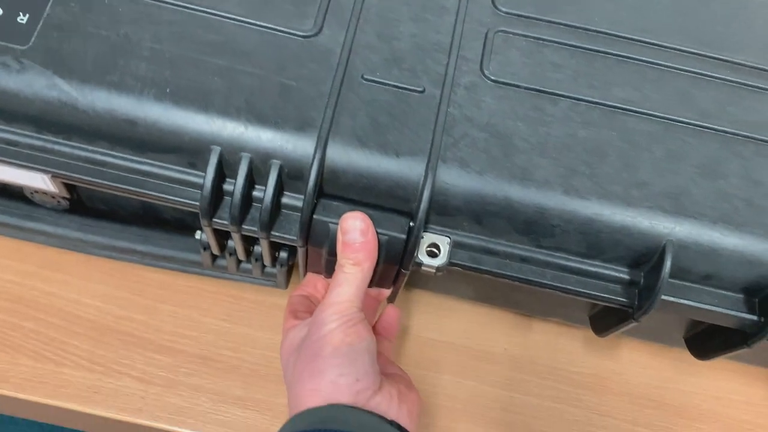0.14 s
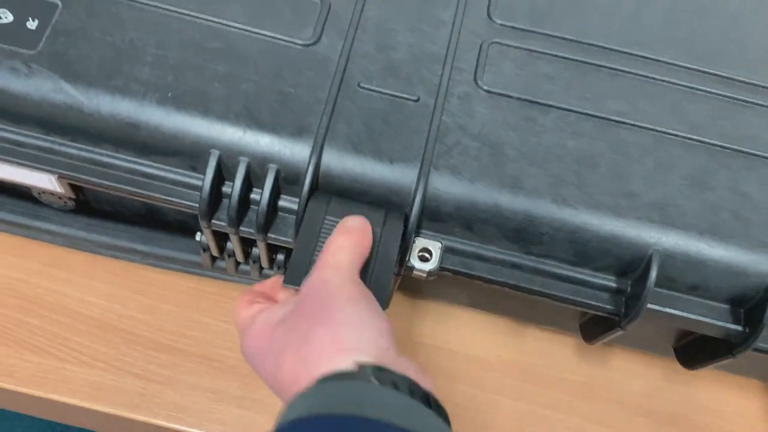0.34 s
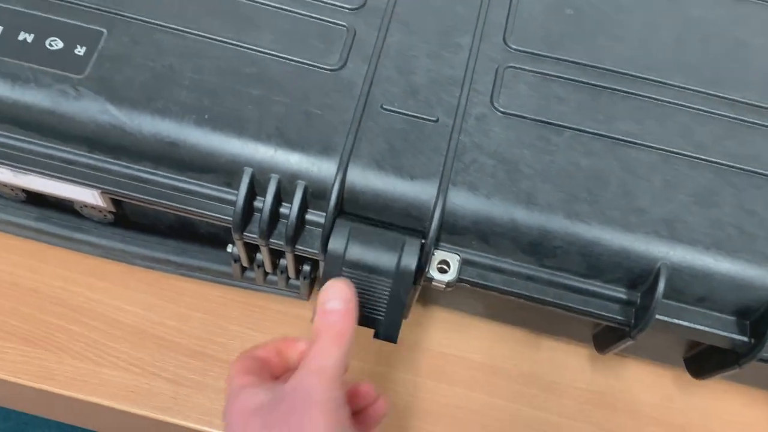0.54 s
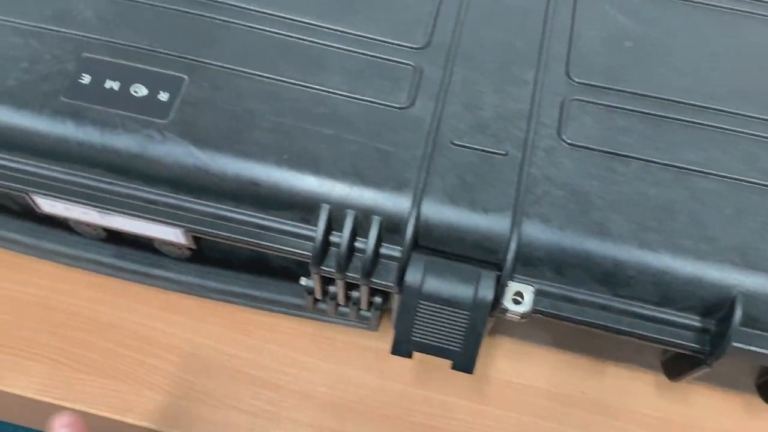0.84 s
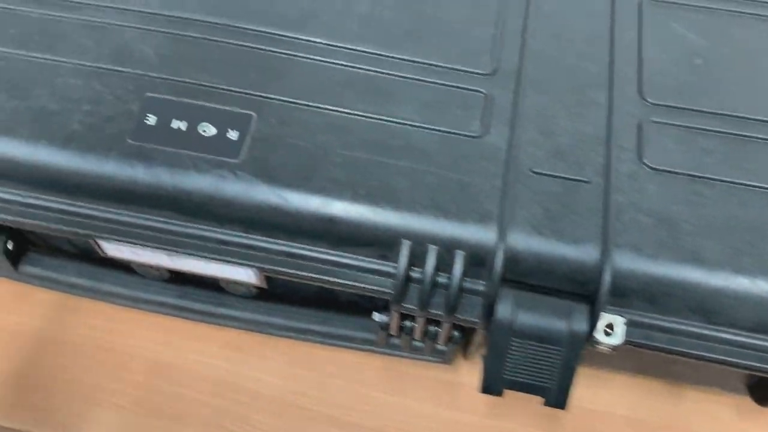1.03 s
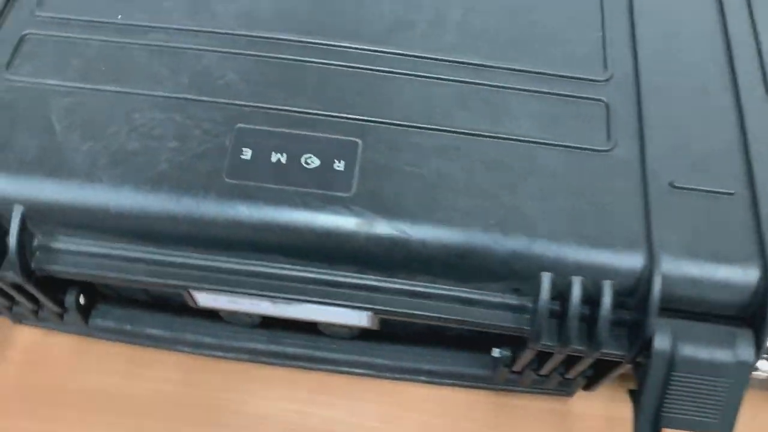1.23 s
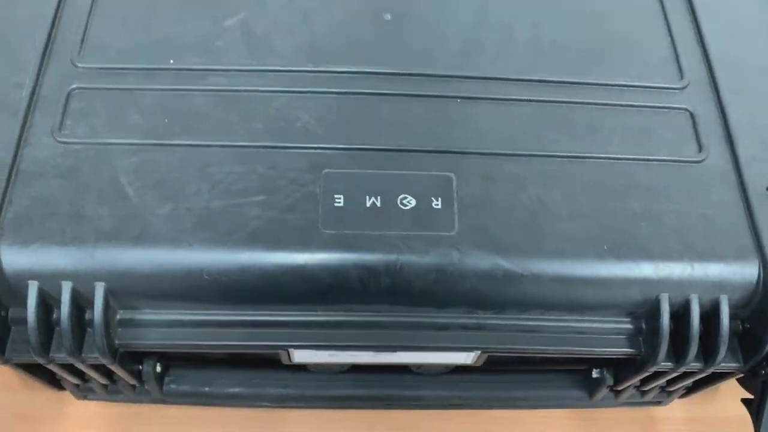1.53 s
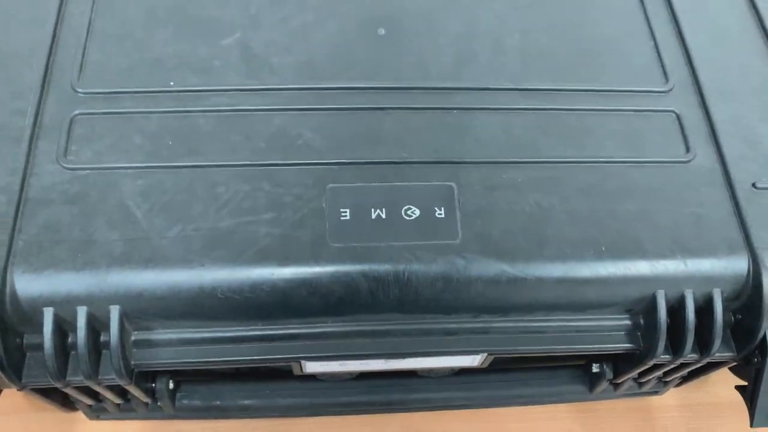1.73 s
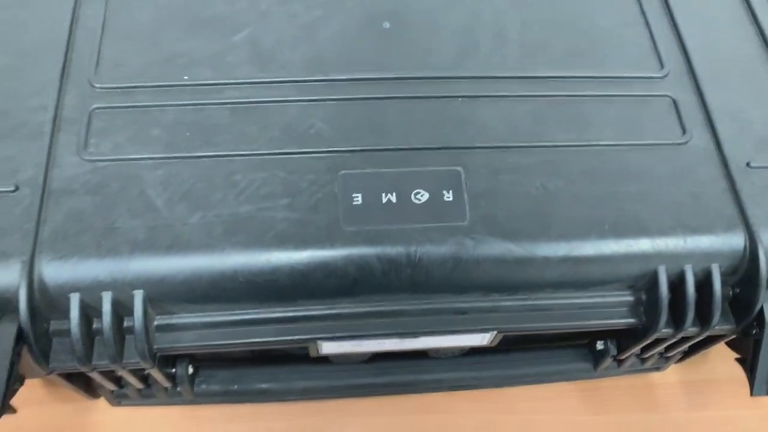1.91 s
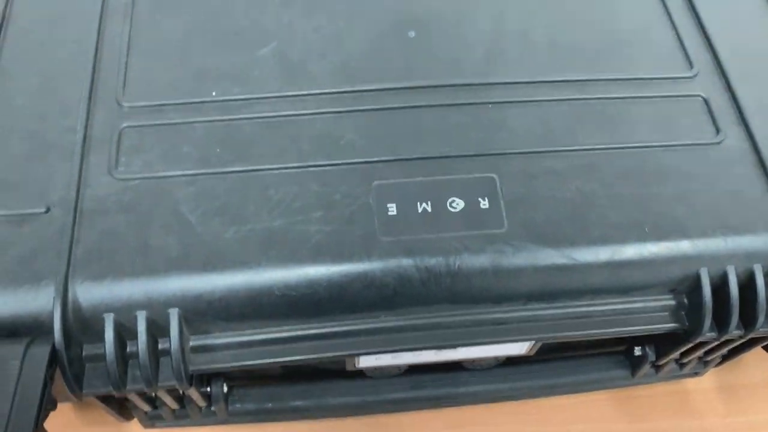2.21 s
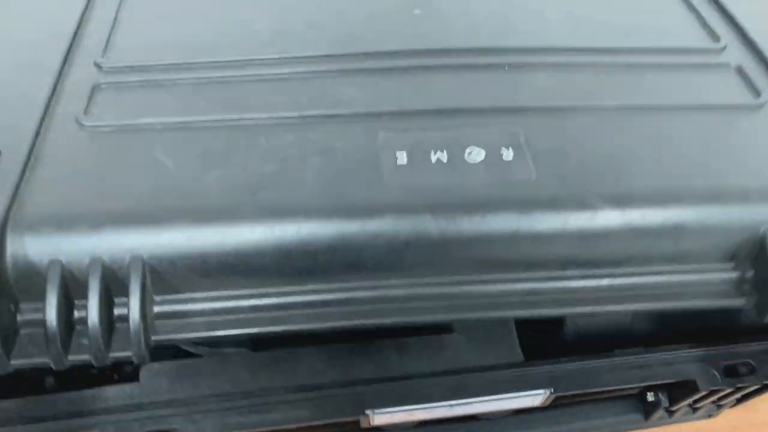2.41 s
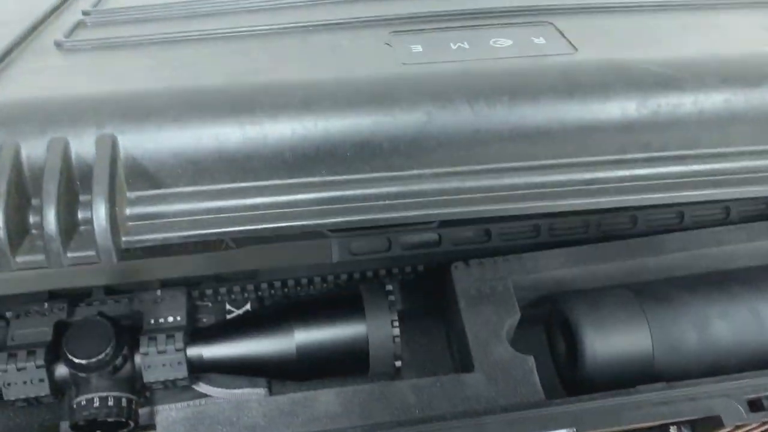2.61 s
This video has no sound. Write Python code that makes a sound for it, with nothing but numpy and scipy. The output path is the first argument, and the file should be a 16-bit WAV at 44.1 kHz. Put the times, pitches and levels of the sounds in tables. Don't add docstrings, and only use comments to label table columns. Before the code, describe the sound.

Close stereo phone pickup in a quiet, slightly echoing room: a case latch cracks open and drops back, fingers brush and tick a loose handle, then a sticky seal tears and the hollow lid thumps upward.

```python
import sys
import numpy as np
from scipy import signal
from scipy.fft import rfft, irfft
from scipy.io import wavfile
from scipy.ndimage import uniform_filter1d

SR = 44100
rng = np.random.default_rng(int(sys.argv[2]) if len(sys.argv) > 2 else 0)


def store_pcm(level_fs):
    pcm = np.round(np.clip(level_fs, -1, 1) * 32767).astype(np.int16)
    wavfile.write(sys.argv[1], SR, np.atleast_2d(pcm).T)


def voltage_ratio(decibels):
    exponent = np.asarray(decibels, float) / 20
    return 10 ** exponent


N = 121275
SIDES = np.array([[1], [-1]])


def colour(x, points):
    p, n = np.array(points), x.shape[-1]
    hz = np.maximum(np.fft.rfftfreq(n, 1 / SR), 1)
    gain_db = np.interp(np.log(hz), np.log(p[:, 0]), p[:, 1])
    return irfft(rfft(x) * voltage_ratio(gain_db), n)


def unit(x):
    return x / np.sqrt(np.mean(x ** 2))


def peak(x):
    return x / np.abs(x).max()


def fade(t, t60):
    return np.exp(-np.log(1000) * t / t60)


def add(out, start_s, x):
    i = int(start_s * SR)
    out[i:i + len(x)] += x[:len(out) - i]


# pitch_hz, level_db (per Hz)
AIR_COLOUR = [(20, -27.5), (40, -8), (75, -9), (170, -32), (500, -47), (3000, -51.5), (14500, -53),
              (16000, -79.5)]


def air():
    sway = unit(uniform_filter1d(rng.standard_normal(N), 3000))
    mid, side = colour(rng.standard_normal((2, N)), AIR_COLOUR)
    return voltage_ratio(-65 + 2 * sway) * unit(mid + 0.18 * side * SIDES)


# pitch_hz, t60_s, level_db
ROOM_DECAY = [(69.4, 0.32, -24), (148, 0.67, -6), (400, 0.81, -9.5), (930, 0.51, -7), (2310, 0.59, -10),
              (4600, 0.3, -12), (10400, 0.35, -16)]


def room(x):
    t, tail = np.arange(SR) / SR, 0
    for hz, t60, db in ROOM_DECAY:
        band = signal.butter(2, [hz / 2.034, hz * 1.405], "band", fs=SR, output="sos")
        mid, side = signal.sosfilt(band, rng.standard_normal((2, SR)))
        width = min(hz / 500, 1)
        strength = voltage_ratio(db) / np.sqrt(t60 * SR / 14)
        tail = tail + strength * fade(t, t60) * (mid + width * side * SIDES)
    tail = tail * (1 - np.exp(-t / 0.002))
    return signal.fftconvolve(x[None], tail, axes=1)[:, :N]


LEFT_DB = -4.5
PORT_GAIN = voltage_ratio(LEFT_DB / 2 * SIDES)


def ports(x, lead_ms, scatter):
    hz = np.fft.rfftfreq(N, 1 / SR)
    early = irfft(rfft(x) * np.exp(2j * np.pi * hz * lead_ms / 1000), N)
    taps = rng.standard_normal((2, 600)) * fade(np.arange(600) / SR, 0.019)
    taps = taps - taps.mean(1)[:, None]
    spread = signal.fftconvolve(x[None], taps, axes=1)[:, :N] * scatter / 6
    return (np.array([early, x]) + spread) * PORT_GAIN


def friction(pressure, points, grains_hz, trim_db):
    c, hold = np.array(pressure), int(SR / grains_hz)
    flutter = np.repeat(rng.standard_normal(N // hold + 1), hold)[:N]
    flutter = uniform_filter1d(flutter, hold)
    press_db = np.interp(np.arange(N) / SR, c[:, 0], c[:, 1], left=-130, right=-130)
    hiss = unit(colour(rng.standard_normal((2, N)), points))
    return hiss * voltage_ratio(press_db + trim_db + 4.5 * flutter)


def ring(t, modes, scatter_db, luck):
    hz, db, t60 = np.array(modes).T[:, :, None]
    level_luck, pitch_luck = luck[:, :, None]
    gain = voltage_ratio(db + scatter_db * level_luck)
    return (gain * fade(t, t60) * np.sin(2 * np.pi * hz * (1 + 0.029 * pitch_luck) * t)).sum(0)


# pitch_hz, level_db (per Hz)
CRACK_COLOUR = [(400, -18), (800, -6), (2500, -2.5), (5000, -10), (9000, -14.5), (14000, -16),
                (16000, -50.5)]


def ticks(rows, ring_t60, burst_s, rise_s, partners):
    out, wet, t = np.zeros(N), np.zeros(N), np.arange(4096) / SR
    for start_s, db, hz, crack_db, top_hz in rows:
        scrape = 0.15 * rng.standard_normal(300) * np.exp(-t[:300] / burst_s)
        contact = np.exp(-t[:300] / 4e-5) + scrape
        modes = [(hz, 0, ring_t60)] + [(hz * ratio, rel_db, ring_t60) for ratio, rel_db in partners]
        body = ring(t, modes, 4.1, 0.5 * rng.standard_normal((2, len(modes))))
        body = body * (1 - np.exp(-t / 0.0015)) ** 2
        body = peak(np.convolve(body, contact)[:4096])
        noise = colour(rng.standard_normal(4096), CRACK_COLOUR)
        dull = signal.lfilter(*signal.butter(4, 1.147 * top_hz, fs=SR), noise)
        crack = voltage_ratio(crack_db) * peak(dull * fade(t, 0.012) * (1 - np.exp(-t / rise_s)))
        gain = voltage_ratio(db) / np.abs(body + crack).max()
        add(out, start_s, gain * (body + crack))
        add(wet, start_s, gain * (0.37 * body + crack))
    return out, wet


def knocks(rows, modes, shell_db, sag, trim_db):
    out, t = np.zeros(N), np.arange(24000) / SR
    for start_s, db, hz, contact_ms, t60 in rows:
        push = np.sin(np.pi * np.minimum(t[:900] * 1000 / contact_ms, 1)) ** 2
        turns = np.cumsum(hz * (1 - sag * (1 - np.exp(-t / 0.036)))) / SR
        panel = fade(t, t60) * np.sin(2 * np.pi * turns)
        luck = np.clip(rng.standard_normal((2, len(modes))), -1, 1)
        body = voltage_ratio(shell_db) * ring(t, modes, 3.3, luck) + panel
        body = body * (1 - np.exp(-t / (0.0021 * contact_ms)))
        add(out, start_s - 0.001, voltage_ratio(db + trim_db) * peak(signal.fftconvolve(body, -push)))
    return out


# start_s, level_db
RUB = [(1.05, -79), (1.3, -68), (1.4, -62), (1.46, -59.5), (1.5, -60), (1.57, -61.5), (1.6, -50.5),
       (1.7, -58), (1.79, -66.5), (2.06, -68.5), (2.085, -55.5), (2.135, -59.5), (2.16, -61.5)]
# pitch_hz, level_db (per Hz)
RUB_COLOUR = [(180, -26), (300, -7.5), (885, -18), (2200, -18.5), (2850, -15), (3500, -21.5),
              (11700, -40.5), (16000, -49)]


def finger_rub():
    return friction(RUB, RUB_COLOUR, 60, 2.6)


# pitch_hz, level_db, t60_s
SHELL_MODES = [(60.3, -5.5, 0.18), (93, -18.5, 0.1), (118, -6.5, 0.2), (142.6, -14, .35), (194, 2, 0.046),
               (241, -3.5, 0.056), (282.4, -14.5, 0.22), (388, -11.5, 0.14), (448.6, -11.5, 0.1),
               (578.2, -12.5, 0.092), (738, -9, 0.061), (805, -13.5, 0.062), (944, -9.5, 0.03)]
# start_s, level_db, pitch_hz (panel), contact_ms, t60_s
KNOCKS = [(0.071, -48.5, 82.6, 3.8, 0.16), (0.2500, -5.5, 420, 0.72, 0.025),
          (0.254, -13.5, 191.6, 2.07, .1), (0.2565, -7.5, 118, 2.53, 0.091), (.284, -17.5, 100.7, 4.1, .12),
          (0.318, -10, 133, 1.4, 0.05), (0.337, -16, 233, 2.2, 0.06), (.358, -19, 131, 2.44, 0.027),
          (0.57, -16.5, 327, 0.64, 0.037), (0.58, -20.5, 173.4, 2.9, .06), (0.595, -20.5, 141, 1.3, 0.048),
          (0.673, -26, 191, 1.6, 0.06), (0.749, -35.5, 230, 1.7, 0.077), (0.794, -38, 216.4, 3.8, 0.066),
          (1.819, -24.5, 116.2, 3, 0.13)]
# start_s, level_db, pitch_hz (panel), contact_ms, t60_s
HAND = [(1.176, -45, 59.6, 0.87, 0.076), (1.322, -33, 134.5, 3.15, 0.14), (1.40, -33.5, 100, 1.04, 0.11),
        (1.42, -35, 313, 0.4, 0.057), (1.455, -30.5, 285, 0.61, 0.034), (1.47, -37, 134, 1.5, 0.081),
        (1.562, -43.5, 245, 1, .05), (1.60, -41, 132, 1.4, 0.12), (1.638, -34, 106, 2, 0.039),
        (1.672, -40, 124.5, 1.9, 0.22), (1.695, -35, 201, 0.91, 0.065), (1.812, -26, 217.7, 0.91, 0.052),
        (2.099, -40, 269, 1.4, 0.067), (2.112, -40.5, 115.3, 2.3, 0.19)]


def shell_knocks():
    parts = knocks(KNOCKS, SHELL_MODES, -6, 0.03, -1.4)
    return parts + knocks(HAND, SHELL_MODES, -6.5, 0.238, -1.75)


# start_s, level_db
PEEL = [
    (2.172, -56.5),
    (2.182, -45.5),
    (2.208, -34.5),
    (2.232, -47),
    (2.258, -38),
    (2.275, -53.5),
    (2.302, -41),
    (2.33, -51),
    (2.41, -45),
    (2.5, -74),
]
# pitch_hz, level_db (per Hz)
PEEL_COLOUR = [(500, -12.5), (900, -5.5), (4500, -2), (7000, -11), (14000, -17), (16000, -42)]


def seal_peel():
    return friction(PEEL, PEEL_COLOUR, 250, 0.63)


# start_s, level_db, pitch_hz (panel), t60_s
LID_KNOCKS = [(2.198, -29, 714, 0.074), (2.2, -27, 300, 0.053), (2.211, -15.5, 450, 0.03),
              (2.214, -19, 139, 0.044), (2.234, -12.5, 79, 0.05), (2.26, -18.5, 393, 0.045),
              (2.267, -10.5, 107.7, 0.18), (2.302, -25, 437, 0.056), (2.306, -7, 213, 0.065),
              (2.325, -13, 109.6, 0.23), (2.363, -16.5, 468, 0.028), (2.369, -1.5, 159, 0.039),
              (2.391, -13, 170, 0.049), (2.401, -15, 466, 0.031), (2.416, -14.5, 232, 0.067),
              (2.43, -16, 319, 0.1), (2.447, -30, 840, 0.07), (2.475, -16.5, 167, 0.08),
              (2.51, -27, 270, 0.12), (2.54, -30, 225.6, 0.094), (2.589, -41, 202.3, .06),
              (2.71, -40, 150, .07)]


def lid_knocks():
    rows = [(start_s, db, hz, 280 / hz, t60) for start_s, db, hz, t60 in LID_KNOCKS]
    return knocks(rows, SHELL_MODES[2:], -10.5, 0.024, -2.3)


# start_s, level_db, pitch_hz, crack_db (under the ring), top_hz (of the crack)
LID = [
    (2.2095, -21, 4390, 0, 9000),
    (2.2225, -23, 5430, -33, 9000),
    (2.2825, -26, 2864, -5, 6000),
    (2.2960, -26, 970, -5.5, 6000),
    (2.3440, -18.5, 2460, 7.5, 15200),
    (2.3635, -18, 1643, 1, 12000),
    (2.6400, -51, 2837, 3, 3500),
    (2.6590, -41, 2170, -4.5, 3500),
    (2.6870, -47.5, 2180, -2, 2970),
]


def lid_ticks():
    return ticks(LID, 0.014, 0.00047, 0.0019, [(0.93, -13), (1.1, -16)])


# start_s, level_db, pitch_hz, crack_db (under the ring), top_hz (of the crack)
HANDLE = [(1.3178, -51, 3000, 13, 6000), (1.3926, -35, 2770, -10, 5000), (1.4182, -32.5, 2930, -1.5, 6900),
          (1.4560, -33, 2440, 3.5, 7000), (1.4660, -33, 2810, -2, 6050), (1.4740, -29, 2960, -11, 6000),
          (1.4790, -37.5, 2950, -18, 6000), (1.4960, -48, 2640, -10, 4000), (1.5092, -18, 2870, -9, 5950),
          (1.5800, -45, 4530, 0, 7000), (1.6110, -34, 706, -3.5, 4000), (1.6431, -37.5, 2840, -16, 4000),
          (1.6772, -15, 2898, -9, 8200), (1.727, -36.5, 2783, -2.5, 4000), (1.8207, -34.5, 2646, -8, 3500),
          (2.0050, -30.5, 2723, 0.5, 2800), (2.0505, -40, 2775, -21, 2810), (2.0985, -44.5, 730, -6, 3000),
          (1.9150, -51.5, 2746, -8, 3500), (2.1300, -48, 3950, -3, 5000)]


def handle_ticks():
    return ticks(HANDLE, 0.015, 0.0017, 0.0018, [(0.511, -9), (0.99, -5.5), (0.9, -10), (1.56, -18.5)])


# start_s, level_db
STRAIN = [
    (.224, -60.5),
    (.247, -22.5),
]


def latch_strain():
    return friction(STRAIN, RUB_COLOUR, 400, 0)


# start_s, level_db, pitch_hz, crack_db (under the ring), top_hz (of the crack)
LATCH = [(.2472, -10.5, 1610, 5.5, 9000), (.2505, -2.5, 1260, 4, 9700), (.2555, -9, 3150, 2, 9300),
         (.2880, -21.5, 3000, -12.5, 5000), (.3100, -13.5, 1446, -0.5, 6000), (.3150, -6, 1550, 23, 14300),
         (.3280, -11.5, 1457, 2, 14000), (.3355, -6.5, 1525, 5.5, 11990), (.5680, -24, 1350, 7, 5950),
         (.5725, -19.5, 1900, 7, 4020), (.5845, -20.5, 2460, -7.5, 12070), (.6165, -19.5, 1516, -16, 4000),
         (.6270, -32, 2930, 8, 5850), (.6420, -39, 1500, -15.5, 3000), (.6680, -30.5, 1640, 3.5, 4930),
         (.7430, -38, 1670, -2, 3990), (.7895, -41.5, 1900, 0, 3500), (.8170, -50.5, 1800, -11.5, 3000)]


def latch_clacks():
    return ticks(LATCH, 0.0092, 0.00017, 0.0013, [(0.85, -12), (1.1, -9.5), (1.75, -8)])


def scene():
    rub = finger_rub() + seal_peel() + latch_strain()
    shell, lifted = shell_knocks(), lid_knocks()
    lid, lid_wet = lid_ticks()
    handle, handle_wet = handle_ticks()
    latch, latch_wet = latch_clacks()
    near = rub * PORT_GAIN + ports(shell, -0.05, 0.099) + ports(lifted, 0.3, 0.2)
    near = near + ports(lid, 0.29, 0.5) + ports(handle, 0.3, 0.5) + ports(latch, 0.13, 0.5)
    send = 1.3 * rub[1] + 0.99 * shell + 0.79 * lifted
    send = send + 2.35 * lid_wet + 1.07 * handle_wet + 1.28 * latch_wet
    return near + room(send) + air()


def low_pass(x):
    return signal.sosfilt(signal.butter(12, 16440, fs=SR, output="sos"), x)


# pitch_hz, lag_rad (of the left port)
CAVITY = [(7500, -1.8), (8600, -1.0), (10000, .6), (11400, 3.1), (13100, 5.5), (14800, 6.8)]


def record(dry):
    thinned = signal.sosfilt(signal.butter(3, 45, "high", fs=SR, output="sos"), dry)
    treble = [(7000, 0.0), (9200, 2.5), (11600, -2.5), (15200, -1), (16300, -11.5)]  # Hz, dB
    left, right = rfft(colour(thinned, treble))
    hz = np.fft.rfftfreq(N, 1 / SR)
    share = 0.8 * np.clip((hz - 6500) / 1500, 0, 1)
    lag = np.interp(hz, *np.array(CAVITY).T)
    left = np.sqrt(1 - share) * left + np.sqrt(share) * right * np.exp(-1j * lag)
    x = irfft(np.array([left, right]), N)
    return low_pass(np.tanh(1.102 * x) / 0.98)


dry = scene()
out = record(dry)
store_pcm(out)
```